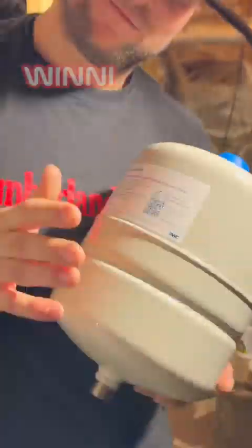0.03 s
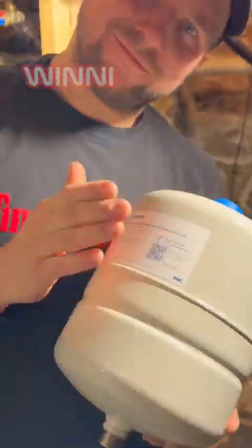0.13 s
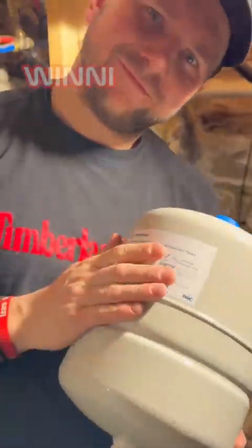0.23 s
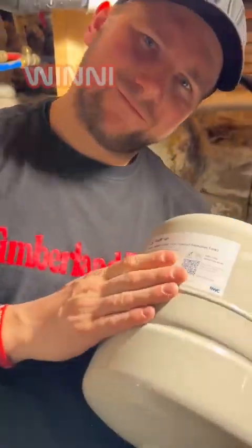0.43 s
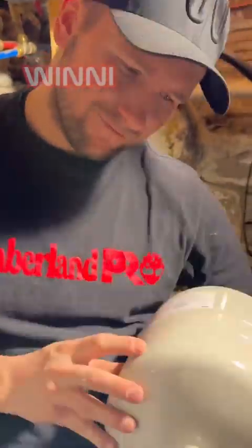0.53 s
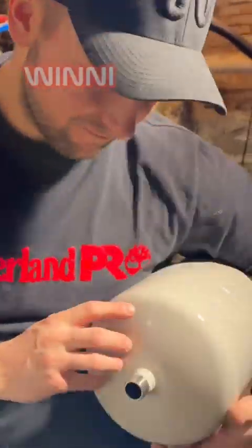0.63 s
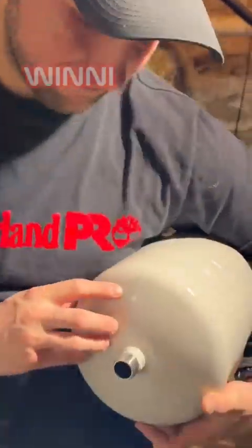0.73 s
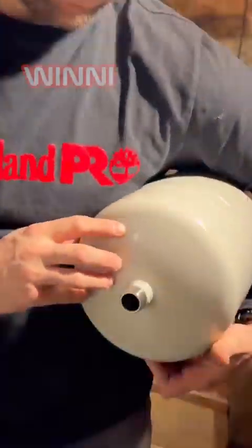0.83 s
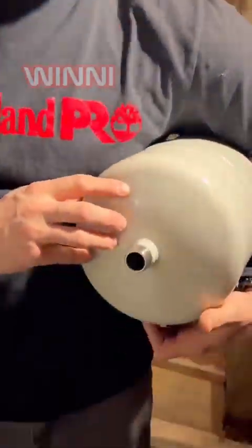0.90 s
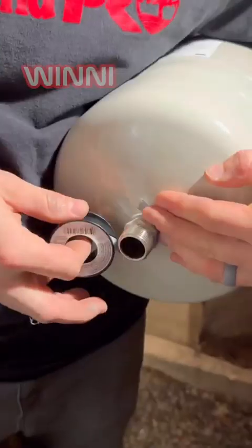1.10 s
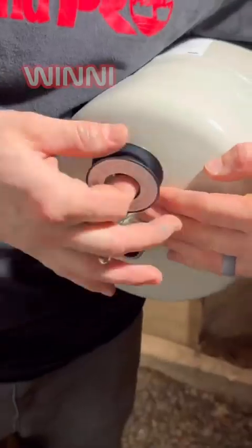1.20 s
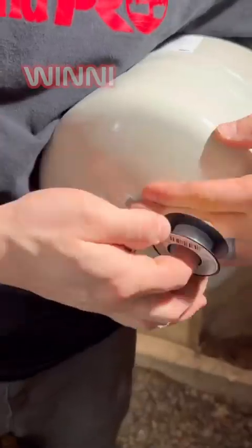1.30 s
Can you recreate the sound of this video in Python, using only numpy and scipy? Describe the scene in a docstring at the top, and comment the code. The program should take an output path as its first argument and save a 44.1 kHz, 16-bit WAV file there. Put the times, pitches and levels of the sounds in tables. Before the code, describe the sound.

Four quick knocks on a small hollow steel tank, then faint handling rustles.

```python
"""A faint brush of skin and cloth in a quiet basement, then four close knocks on a small hollow steel tank.
Each knock cracks, thumps the shell and leaves a short dense rattle of overtones; one thin note rings on.
Then the tank is turned in the hands: light touches, rustling skin and cloth, a few ticks from a plastic
tape spool. Ringing is made of fading sine waves; rubbing is noise whose loudness flickers."""
import sys
import numpy as np
from scipy import signal
from scipy.fft import rfft, irfft
from scipy.io import wavfile
from scipy.ndimage import uniform_filter1d

SR = 44100
rng = np.random.default_rng(int(sys.argv[2]) if len(sys.argv) > 2 else 0)


def master(y):
    """Save y as 16-bit WAV."""
    cut = np.clip(np.atleast_2d(y).T, -1, 1)
    pcm = np.round(cut * 32767)  # scale
    wavfile.write(sys.argv[1], SR, pcm.astype(np.int16))


N = 59535
T = np.arange(N) / SR
HZ = np.arange(N + 1) * SR / (2 * N)
WIDE_HZ = 1300  # below this, left and right sound nearly the same


def undb(db):
    """Turn decibels into a number to multiply by."""
    return 10 ** (np.asarray(db) / 20)


def curve(points, hz=HZ):
    """Join (f/Hz, value) points with lines, giving every octave equal room."""
    freqs, values = np.array(points, float).T
    return np.interp(np.log(np.maximum(hz, 1)), np.log(freqs), values)


def colour(x, points):
    """Turn lows and highs up or down along (f/Hz, level/dB) points."""
    cepstrum = irfft(np.log(undb(curve(points))))
    cepstrum[1:N] *= 2  # folded forward, so nothing rings before its hit
    cepstrum[N + 1:] = 0
    return irfft(rfft(x, 2 * N) * np.exp(rfft(cepstrum)))[..., :N]


def noise(points, width):
    """Stereo noise with the given tone; more width makes left and right less alike."""
    mid, side = rfft(rng.standard_normal((2, 2 * N)))
    gain = undb(curve(points))
    side = side * width * HZ / np.hypot(HZ, WIDE_HZ)
    return irfft(np.array([mid + side, mid - side]) * gain)[:, :N] / np.sqrt(np.mean(gain ** 2))


def swell(at, rise, fade):
    """Grow to a peak, then die away. A fade is always the seconds taken to drop 60 dB."""
    growing = (T - at) / rise
    dying = (at - T) * np.log(1000) / fade
    return np.exp(np.maximum(np.minimum(growing, dying), -20))


def ring(at, hz, fade):
    """One struck note: a fading sine wave."""
    age = np.maximum(T - at, 0)
    return np.sin(2 * np.pi * hz * age) * np.exp(-np.log(1000) * age / fade)


def friction(strokes, tone, grain_db, grain_s):
    """Rubbing noise that catches and slips during each stroke."""
    held = max(int(grain_s * SR), 2)
    grip = uniform_filter1d(rng.standard_normal(N)[np.arange(N) // held], held)
    level = sum(undb(db) * swell(at, rise, fade) for at, db, rise, fade in strokes)
    return noise(tone, width=.45) * level * undb(grain_db * grip)


# Tone of the room: f/Hz, level/dB
ROOM_TONE = [(30, -33), (64, -18), (95, -3), (150, 3.5), (260, -3), (400, -13), (800, -11), (1600, -21.5),
             (3200, -25), (6300, -27.5), (10000, -34), (15000, -32)]
def basement():
    """The room's faint, steady rumble."""
    return undb(-69.5) * noise(ROOM_TONE, width=.2)


# Palm strokes: peak t/s, level/dB, rise/s, fade/s
SLIDE_STROKES = [(0.04, -73, 0.027, 0.9), (0.53, -73, 0.048, 0.29), (0.60, -56, 0.023, 0.15),
                 (0.662, -53.5, 0.02, 0.26), (0.812, -63.5, 0.011, 0.22), (1.178, -72.5, 0.052, .35)]
# Their tone: f/Hz, level/dB
SLIDE_TONE = [(100, -11.5), (300, -2.5), (550, 1.5), (800, 1), (1100, 2), (1600, -7.5), (2700, -3),
              (5000, -4.5), (9000, -12.5), (15500, -18)]
def palm_slides():
    """A palm slides over the steel shell."""
    return friction(SLIDE_STROKES, SLIDE_TONE, grain_db=2, grain_s=.0035)


# Rustles: peak t/s, level/dB, rise/s, fade/s
RUSTLE_STROKES = [(0.04, -71, 0.029, 0.22), (0.52, -74, .006, .4), (0.81, -72.5, .012, 0.17),
                  (1.0, -62, 0.02, 0.33), (1.10, -69, .03, 0.76), (1.25, -68, 0.047, 0.53),
                  (1.313, -57.5, 0.0077, 0.094)]
# Their tone: f/Hz, level/dB
RUSTLE_TONE = [(500, -6.5), (2000, -8), (5000, -3.5), (9000, -4), (12000, -0.5), (15500, 4)]
def cloth_rustles():
    """Skin and cloth rub with a dry, bright rustle."""
    return friction(RUSTLE_STROKES, RUSTLE_TONE, grain_db=1.95, grain_s=.0045)


# Tone of a knock's crack: f/Hz, level/dB
CRACK_TONE = [(60, -19.5), (200, -6), (600, -3.5), (1150, 5), (1600, -8), (3000, -1.5), (4600, -6.5),
              (6800, -3), (10000, -7), (15500, -6.5)]
def contact_noise():
    """The noise of hand meeting steel; each knock uses a short burst of it."""
    return undb(-9) * noise(CRACK_TONE, width=.19)


# The shell's own notes: f/Hz, level/dB, fade/s
SHELL_NOTES = [(154.7, -27.5, 0.14), (228, -28, 0.082), (274.1, -23.5, .12), (485, -30.5, 0.14),
               (759, -29, 0.06), (964.5, -23, .07), (1096.6, -16, 0.046), (1274, -24, .07),
               (1390, -28.5, 0.048), (2190, -31.5, 0.066), (2855, -28.5, .055), (3057, -26, .05),
               (3153, -42, 0.29), (3241, -19, 0.077), (4340, -27.5, 0.03), (5485, -29.5, 0.039),
               (6254, -21, .06), (6620, -25, 0.031)]
def shell_ring():
    """Struck steel rings at many notes at once, each reaching left and right unequally."""
    leans = .35 * rng.uniform(-1.3, 1, len(SHELL_NOTES))
    out = 0
    for k, (hz, db, fade) in enumerate(SHELL_NOTES):
        sides = 1 + np.array([[1], [-1]]) * leans[k] * hz / (hz + WIDE_HZ)
        out += undb(db - 4) * (-1) ** k * ring(0, hz, fade) * sides
    return out


# Bands of the rattle: f/Hz, level/dB, fade/s
RATTLE_BANDS = [(100, -3.5, 0.056), (248, -2.5, 0.085), (500, -2.5, .12), (1190, 1.5, 0.11),
                (1650, -5.5, .11), (3150, 0.5, 0.082), (4650, -5.5, 0.083), (7000, 0.5, 0.078),
                (10000, -9, 0.12), (15500, -10, 0.13)]
def overtone_rattle(rise_s=.002):
    """Countless weak overtones and echoes off near walls blur into noise; each band has its own fade."""
    spectrum = rfft(noise([row[:2] for row in RATTLE_BANDS], width=1))
    hz = np.arange(spectrum.shape[1]) * SR / N
    out = 0
    for k, (_, _, fade) in enumerate(RATTLE_BANDS):
        share = curve([(row[0], j == k) for j, row in enumerate(RATTLE_BANDS)], hz)
        out += irfft(spectrum * share, N) * np.exp(-np.log(1000) * T / fade)
    return out * (1 - np.exp(-T / rise_s))


# Four knocks (the last with a second finger), then two light touches: t/s, level/dB,
# tone (low/dB, hollow/dB, ring/dB, clang/dB, snap/dB), the struck spot's note (f/Hz, level/dB)
BLOWS = [(0.1174, -2.5, 4, -8, 1.5, -3, -0.5, 5130, -16.5),
         (0.1927, 0.5, -1.5, 2.5, -5, -3.5, -9, 4424, -24),
         (0.2630, 0.5, -0.5, -1.5, 1, 1, -5, 5285, -18.5),
         (0.3354, -2, 1, -0.5, -1, -0.5, -3.5, 3290, -15.5),
         (0.3404, -5.5, -5.5, -11, 4, -2.5, -4, 3332, -15),
         (0.558, -38.5, -9, -0.5, -14, -13, -11, 1300, -19),
         (0.5869, -26, -1.5, -9.5, -6.5, -7, -9.5, 3334, -4)]
def tank_knocks():
    """Each blow snaps, cracks, thumps and sets the shell ringing; where it lands sets the tone."""
    tone_hz, neutral_hz = [250, 1150, 3200, 6000, 12000], 553  # tone_hz: one for each tone column
    snap = undb(-6.5) * (T == 0)
    thump = undb(-28.5) * ring(0, hz=228, fade=.03)
    body = shell_ring() + snap - thump + undb(-22.5) * overtone_rattle()
    contact = contact_noise()
    out = 0
    for at, db, *tone_db, spot_hz, spot_db in BLOWS:
        spot = undb(spot_db) * ring(0, spot_hz, fade=.03)
        blow = np.roll(body - spot, round(at * SR), axis=1)
        crack = contact * swell(at, rise=.001, fade=.016)
        tone = sorted([*zip(tone_hz, tone_db), (neutral_hz, 0)])
        out += undb(db) * colour(blow + crack, tone)
    return out


# Swishes: peak t/s, level/dB, rise/s, fade/s
SWISH_STROKES = [(0.515, -67, .004, 0.28), (1.32, -58, .012, .03)]
# Their tone: f/Hz, level/dB
SWISH_TONE = [(2000, -34), (9000, -24), (13000, 5), (15500, 0)]
def skin_swishes():
    """Dry skin skims smooth paint with a thin, high hiss."""
    return friction(SWISH_STROKES, SWISH_TONE, grain_db=4, grain_s=.002)


# Rubs that make the shell hum: peak t/s, level/dB, rise/s, fade/s
HUM_STROKES = [(0.652, -58, 0.027, 0.11), (1.175, -67.5, .025, .2)]
# Their tone: f/Hz, level/dB
HUM_TONE = [(500, -30), (690, -20), (780, 1), (900, -11), (1300, -32), (4000, -67)]
def shell_hum():
    """The shell hums under the sliding palm."""
    return friction(HUM_STROKES, HUM_TONE, grain_db=0, grain_s=.008)


# Ticks: t/s, level/dB, note f/Hz, note level/dB compared with the click
TICK_HITS = [(0.6532, -62.5, 2720, 12.5), (0.6662, -56, 2250, 13), (0.6690, -60.5, 3870, 17.5),
             (1.001, -55.5, 3960, 2.5), (1.0233, -58.5, 997, -3.5), (1.1616, -56, 2904, -3.5),
             (1.3375, -49.5, 2370, -2)]
# Tone of the click: f/Hz, level/dB
CLICK_TONE = [(200, -13.5), (900, -11.5), (1600, -7.5), (3000, -3.5), (5500, 1.5), (9000, -11), (15500, -6)]
def ticks():
    """Fingers and spool make small dry clicks, each with one brief note."""
    grit = noise(CLICK_TONE, width=.45)
    out = 0
    for at, db, hz, note_db in TICK_HITS:
        click = grit * swell(at, rise=.0016, fade=.046)
        note = undb(note_db) * ring(at, hz, fade=.031)
        out += undb(db) * (click + note)
    return out


def scene():
    """Handling and knocks over the rumble of the basement."""
    handling = palm_slides() + shell_hum() + cloth_rustles() + skin_swishes()
    return handling + tank_knocks() + ticks() + basement()


# How the two microphones differ in tone: f/Hz, left minus right level/dB
MIC_BALANCE = [(250, -0.5), (600, -1), (1200, -0.77), (2500, 0.4), (5000, -0.76), (9000, -1), (13000, 4.5)]
def record(dry, low_cut_hz=90, top_hz=16000):
    """Give each side its tone, cut the deep bass, round off the loudest peaks and cut the very top."""
    left = colour(dry[0], [(hz, db / 2) for hz, db in MIC_BALANCE])
    right = colour(dry[1], [(hz, -db / 2) for hz, db in MIC_BALANCE])
    pair = signal.sosfilt(signal.butter(2, low_cut_hz, "high", fs=SR, output="sos"), [left, right])
    pair = 2 * np.tanh(pair / 2)
    return signal.sosfilt(signal.ellip(8, .2, 80, top_hz, fs=SR, output="sos"), pair)


dry = scene()
out = record(dry)
master(out)
```